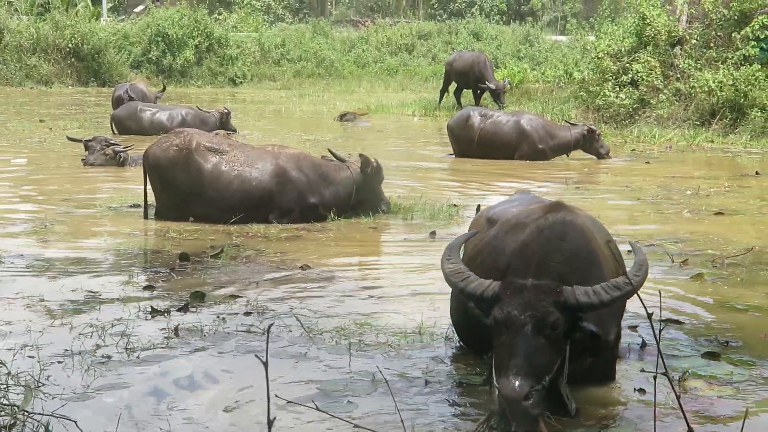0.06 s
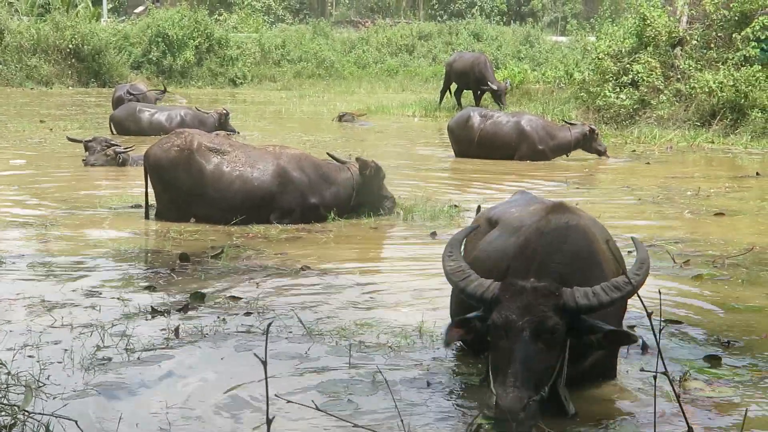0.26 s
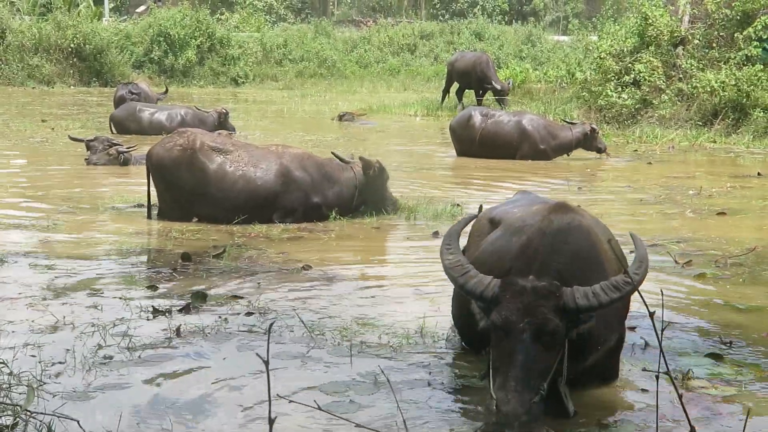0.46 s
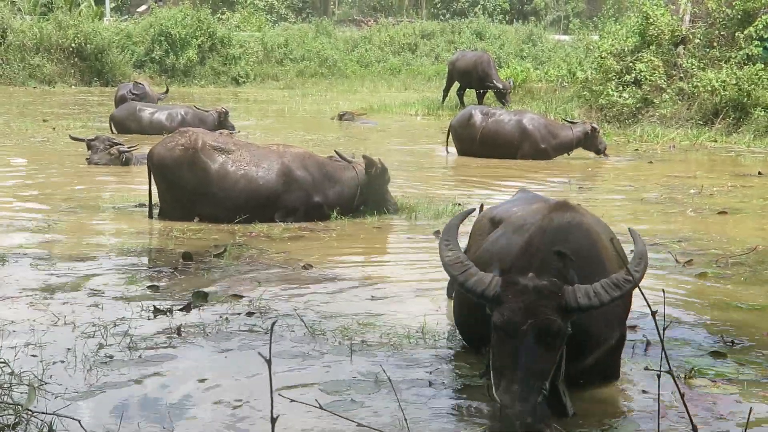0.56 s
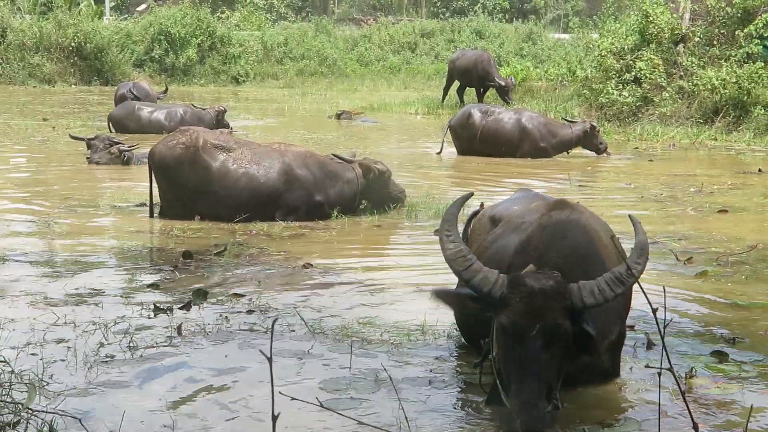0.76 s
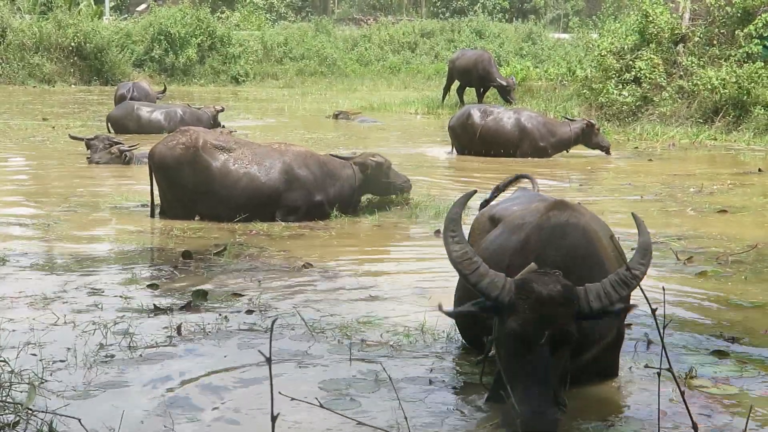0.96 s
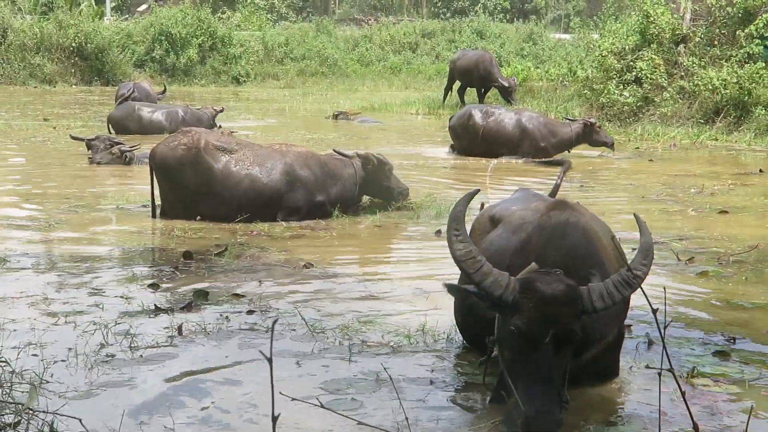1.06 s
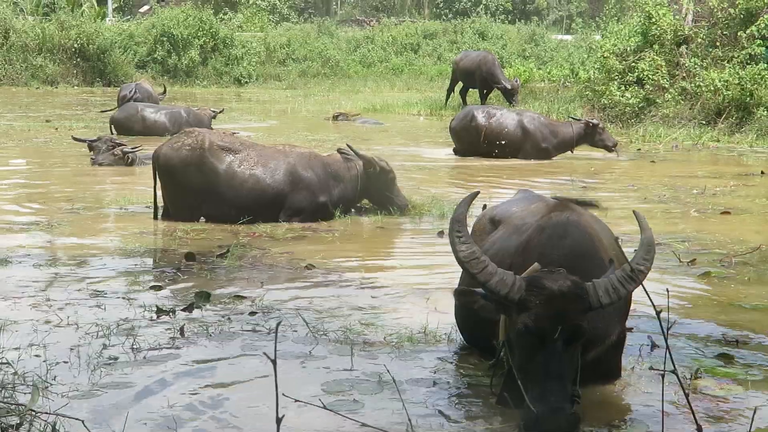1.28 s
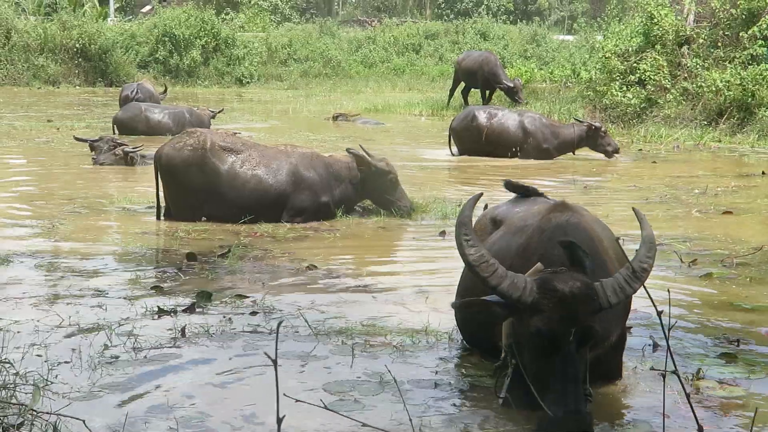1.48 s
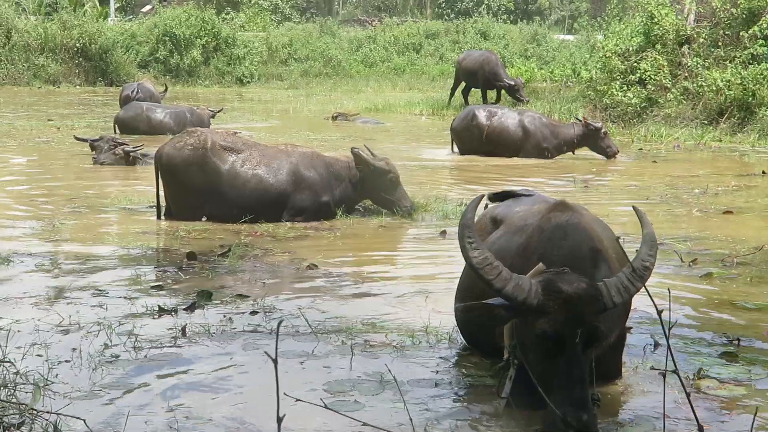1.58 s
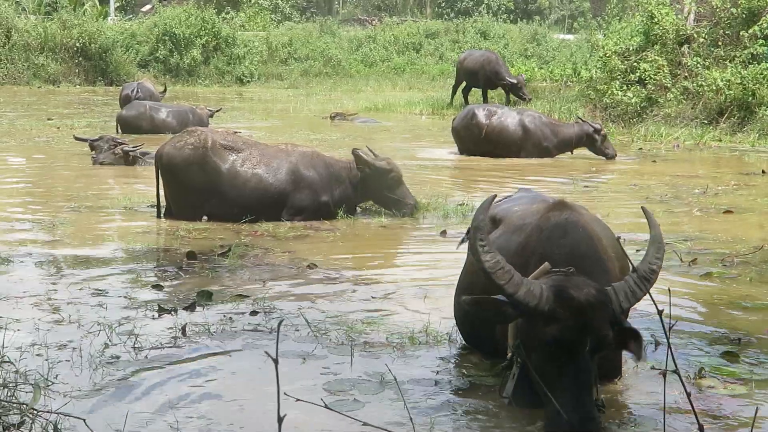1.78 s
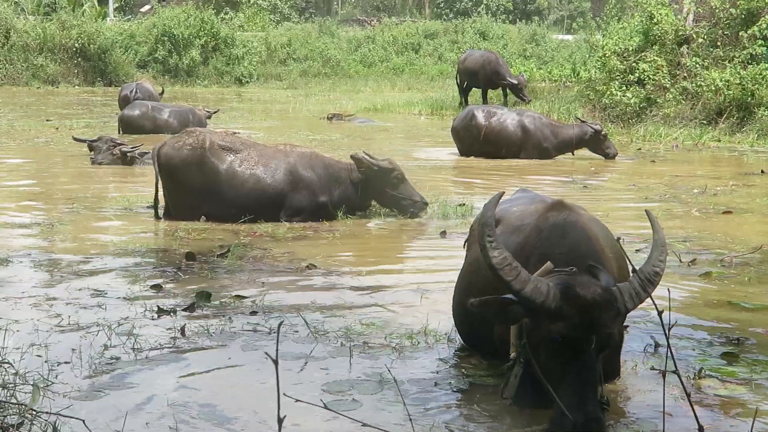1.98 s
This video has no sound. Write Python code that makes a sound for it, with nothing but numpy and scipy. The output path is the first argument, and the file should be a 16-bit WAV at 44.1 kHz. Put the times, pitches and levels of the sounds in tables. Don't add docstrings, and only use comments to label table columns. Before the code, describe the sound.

Water gurgles and fizzes softly around wading buffaloes over a low distant rumble that fades later. A thin high double squeak glides at 0.15-0.45 s; a small bell clinks at 0.4 s, then faintly near 0.9-1.0 s. Drops and splashes burst around 0.8 and 1.0 s. A sharp drop lands left at 1.44 s, a heavy bubbling plunge follows at 1.5 s, another splash at 1.72 s, then trickling bubbles.

```python
import sys
import numpy as np
from scipy import signal
from scipy.fft import rfft, irfft, next_fast_len
from scipy.io import wavfile
from scipy.ndimage import uniform_filter1d, map_coordinates

SR = 44100
rng = np.random.default_rng(int(sys.argv[2]) if len(sys.argv) > 2 else 0)


def elevation(decibels):
    levels = np.asarray(decibels, float)
    return 10 ** (levels / 20)


def persist_wave(psi):
    counts = np.round(np.clip(psi, -1, 1) * 32767).astype(np.int16)
    wavfile.write(sys.argv[1], SR, np.atleast_2d(counts).T)


N = 89478


def unit(x):
    return x / np.sqrt(np.mean(x ** 2) + 1e-20)


def along(points, hz):
    f, value = np.transpose(points)
    return np.interp(np.log(hz + 1), np.log(f + 1), value)


def curves(rows):
    s, *columns = np.transpose(rows)
    return [np.interp(np.arange(N) / SR, s, column) for column in columns]


def wobble(rate):
    knots = rng.standard_normal(int(N * rate / SR) + 4)
    return map_coordinates(knots, [np.arange(N) * rate / SR])


def filtered(x, response):
    m = next_fast_len(x.shape[-1] + 8192)
    spectrum = rfft(x, m) * response(np.fft.rfftfreq(m, 1 / SR))
    return irfft(spectrum, m)[..., :x.shape[-1]]


def rush(spectrum, patchy_db):
    z = signal.stft(rng.standard_normal((2, N)), nperseg=512)[2]
    patches = uniform_filter1d(rng.standard_normal(z.shape[1:]), 6, 0)
    patches = uniform_filter1d(patches, 8, 1)
    pair = signal.istft(z * elevation(patchy_db * unit(patches)), nperseg=512)[1][:, :N]
    return unit(filtered(pair, lambda hz: elevation(along(spectrum, hz))))


def rings(s, db, hz, rise, t60, attack, size):
    t = np.arange(size) / SR
    t60 = np.clip(t60, 2e-4, 9)[:, None]
    glide = 1 + rise[:, None] * np.minimum(t / t60, 1)
    tone = np.sin(2 * np.pi * hz[:, None] * t * glide)
    decay = elevation(db[:, None] - 60 * t / t60)
    wave = decay * (1 - np.exp(-t / attack)) * tone * (t < t[-1])
    at = np.round(s * SR).astype(int)[:, None] + np.arange(size)
    return np.bincount(at.ravel(), wave.ravel(), N + size + SR)[:N]


def grains(count, hz, octave_scatter, cycles, scatter_db):
    u, g = rng.random((count, 2)), rng.standard_normal(count)
    f = np.clip(hz * np.exp(octave_scatter * g), 300, 14000)
    db = -scatter_db * np.log(u[:, 1] + 0.048)
    return unit(rings(u[:, 0] * N / SR, db, f, 0.25 + 0 * f, cycles / f, attack=3e-4, size=1000))


def smeared(x):
    smear = rng.standard_normal(200) * np.exp(-np.arange(200) / 40)
    return np.array([x, np.convolve(x, smear / np.linalg.norm(smear))[:N]])


# t/s, level/dB
RUMBLE_SWELL = [(0, -32.5), (.4, -31.5), (.7, -35.5), (.95, -32), (1.4, -34.5), (1.55, -37.5),
                (2.03, -38.5)]
# f/Hz, level/dB
RUMBLE_COLOUR = [(15, -45), (30, -16), (42, -4.5), (92, 0.5), (134, 0), (152, -4.5), (182, -16.5),
                 (260, -45)]


def rumble():
    level_db, = curves(RUMBLE_SWELL)
    return elevation(level_db + 1.3 * wobble(14)) * rush(RUMBLE_COLOUR, patchy_db=.4)


# t/s, level/dB
WADING = [(0, -44), (.2, -43.5), (.45, -42), (.68, -42.5), (.9, -42), (1.2, -42), (1.4, -41.5),
          (1.6, -42.5), (1.8, -42), (2.03, -42)]
# f/Hz, level/dB
WATER_COLOUR = [(120, -37), (190, -1.5), (400, -3.5), (1500, -9.5), (6000, -18), (10000, -23), (14000, -28),
                (16200, -60)]


def water():
    level_db, = curves(WADING)
    gurgle = grains(count=260, hz=1006, octave_scatter=0.64, cycles=13.5, scatter_db=0.9)
    fizz = grains(count=500, hz=5500, octave_scatter=.5, cycles=6, scatter_db=2.5)
    bits = elevation(-12) * gurgle + elevation(-10.5) * fizz
    return elevation(level_db + 0.73 * wobble(12.63)) * (rush(WATER_COLOUR, patchy_db=1.22) + smeared(bits))


# t/s, f/Hz, level/dB
SQUEAK = [(.15, 9300, -72), (.19, 10300, -59), (.23, 10800, -60), (.27, 11000, -61.5), (.295, 10500, -61),
          (.33, 10700, -57), (.355, 10300, -60), (.41, 9900, -66), (.44, 9700, -78)]


def squeak():
    hz, db = curves(SQUEAK)
    t = np.arange(N) / SR
    on = (t > SQUEAK[0][0]) & (t < SQUEAK[-1][0])

    def tone(ratio):
        shaky_hz = ratio * hz * (1 + 0.004 * wobble(150))
        return elevation(1.8 * wobble(60.6)) * np.sin(2 * np.pi * np.cumsum(shaky_hz) / SR)

    return smeared(on * elevation(db + 2.0) * (tone(1) + elevation(-1.5) * tone(1.18)))


# t/s, peak level/dB, start f/Hz, pitch rise [share], life t60/s
BUBBLES = [(0.254, -37, 7000, .05, .02), (.26, -33.5, 577, 0.15, 0.056), (.507, -35, 1140, 0.12, .015),
           (.655, -40.5, 8800, .05, .03), (.73, -41, 940, .03, .06), (.732, -42, 1220, .03, .07),
           (.752, -41, 1220, .03, .09), (.754, -40, 980, .03, .06), (.765, -39.5, 897, .04, .1),
           (.79, -42, 1250, .03, 0.088), (.8, -37, 990, .04, .06), (.817, -31, 1940, .04, .025),
           (.82, -37, 1480, .04, .03), (.822, -35, 956, .05, .05), (.825, -40, 3040, 0.023, 0.055),
           (.575, -40, 1090, .02, .05), (1.0617, -29, 1213, 0.041, 0.029),
           (1.093, -35.5, 1230, 0.083, 0.037), (1.3, -34, 1165, 0.054, 0.048),
           (1.415, -33.5, 1430, .1, 0.033), (1.483, -28, 276, .2, 0.056), (1.484, -21, 500, .15, 0.057),
           (1.4917, -19.5, 544, .05, .035), (1.491, -21.5, 2150, 0.26, 0.028),
           (1.493, -20, 1204, 0.15, 0.027), (1.5075, -11.5, 900, 0.1, 0.021),
           (1.5107, -13.5, 1220, 0.09, 0.023), (1.509, -27, 3050, .03, .025), (1.718, -29, 260, .1, .06),
           (1.728, -31, 380, .1, .04), (1.645, -37, 1990, 0.031, 0.031), (1.755, -37, 955.3, 0.088, 0.058),
           (1.81, -39.5, 1133, .05, 0.046), (1.81, -41.5, 362, 0.046, 0.12), (1.855, -37, 910, -.1, .03),
           (1.727, -32, 1005, 0.08, 0.034), (1.897, -37, 710, 0.08, 0.026), (1.897, -33, 1430, .05, 0.029)]


def bubbles():
    return smeared(elevation(3.5) * rings(*np.transpose(BUBBLES), attack=0.0024, size=4000))


# t/s, peak level/dB, f/Hz
DROPS = [(0.395, -29, 3500), (.467, -26, 8900), (.472, -41, 2500), (0.508, -31.5, 2000), (0.773, -27, 8000),
         (0.824, -27, 7450), (.826, -23, 8500), (0.8296, -17.5, 6200), (.788, -31, 6000), (.804, -26, 8500),
         (.855, -30, 8000), (0.866, -29, 9000), (1.008, -28.5, 5000), (1.004, -27, 12000),
         (.773, -30, 13500), (1.0, -23, 8000), (1.02, -25.5, 6500), (1.025, -32, 1540), (1.063, -24, 6500),
         (1.063, -27, 3000), (1.167, -26.5, 4700), (1.167, -26.5, 2250), (1.229, -29, 8000),
         (1.4403, -22, 7500), (1.4402, -27.5, 2230), (1.4403, -25, 14000), (1.443, -27, 7000),
         (1.446, -29, 8500), (1.696, -28, 1300), (1.696, -28, 750), (1.7136, -21, 3000),
         (1.7135, -26, 1700), (1.726, -24, 2500), (1.485, -27, 3300), (1.7156, -21, 5500),
         (1.714, -17, 10100), (1.726, -16.5, 4030), (1.935, -29, 8000), (2.012, -31, 7000)]


def drops():
    s, db, hz = np.transpose(DROPS)
    return smeared(rings(s, db + 5, hz, 0 * s, 9 / hz, attack=4e-5, size=600))


# f/Hz, level/dB, t60/s
BELL_MODES = [(1104, -10, .45), (1513, -13, .8), (2616, -13, .5), (2832, -1, .11), (6030, -15, .1),
              (6745, -5, .15), (7628, -9, .15), (10300, -13, .06)]
# t/s, peak level/dB, brightness [dB per octave]
CLINKS = [
    (.4105, -33, -.6),
    (.466, -48, 3),
    (.5, -49, 3),
    (.873, -41, 9),
    (.958, -41, 9),
    (.999, -42, 9),
]


def bell():
    hz, level_db, t60 = np.transpose(BELL_MODES)
    ring = np.zeros(N)
    for s, db, tilt in CLINKS:
        mode_db = db + level_db + tilt * np.log2(hz / 7000) + rng.normal(0, 1.5, len(hz))
        ring += rings(s + 0 * hz, mode_db, hz, 0 * hz, t60, attack=4e-4, size=14000)
    ring *= elevation(1.6 * wobble(40.3))
    quarter_turn = filtered(ring, lambda f: 1j + 0 * f)
    return np.array([ring, quarter_turn])


# t/s, peak level/dB, f/Hz
ASIDE = [
    (.508, -26, 1500),
    (.508, -28, 3500),
    (1.228, -31, 8000),
    (1.4403, -14, 7500),
    (1.4403, -19, 13000),
]


def drops_aside():
    s, db, hz = np.transpose(ASIDE)
    return np.outer([.4, 1], rings(s, db + 5.5, hz, 0 * s, 4 / hz, attack=4e-5, size=600))


# t/s of the peak, level/dB, centre f/Hz, rise/s, fall t60/s
SPLASHES = [(.775, -43, 1000, .03, .5), (0.774, -44, 7200, 0.002, 0.3), (.805, -41, 7600, 0.011, .4),
            (.828, -31, 7000, 0.005, 0.05), (.82, -43, 2500, 0.024, 0.23),
            (.828, -41.5, 14000, 0.0083, .15), (.855, -45.5, 7500, 0.014, 0.23),
            (.953, -40.5, 9500, 0.008, 0.27), (1.0, -39, 7500, 0.0022, 0.15),
            (1.003, -41.5, 4100, 0.0034, .15), (.98, -43.5, 9500, .012, .2), (1.17, -44.5, 3900, .015, .2),
            (1.46, -42, 1700, 0.022, 0.33), (1.06, -46, 3100, 0.015, 0.23),
            (1.441, -38.5, 9600, .0006, 0.33), (1.492, -31.5, 2100, 0.0058, .2),
            (1.515, -33.5, 1500, .01, 0.35), (1.55, -34, 3130, 0.018, 0.12),
            (1.685, -39, 2200, 0.0088, 0.21), (1.716, -31.5, 4300, 0.0066, 0.18),
            (1.722, -37.5, 1500, .012, .12), (1.725, -36, 230, .015, 0.083),
            (1.718, -37.5, 11400, 0.0066, 0.18), (1.5, -38, 380, 0.017, 0.27)]


def splashes():
    size, lead = 12000, 4000
    out = np.zeros((2, N + SR))
    t = (np.arange(size) - lead) / SR
    spikes = elevation(2.5 * wobble(600))
    for s, db, centre, rise, t60 in SPLASHES:
        octaves = 0.42 if centre > 6000 else 0.89
        noise = filtered(rng.standard_normal((2, size)),
                         lambda f: np.exp(-.5 * (np.log2((f + 1) / centre) / octaves) ** 2))
        swell = np.exp(-.5 * (t / rise) ** 2)
        shape = np.where(t < 0, swell, elevation(-60 * np.abs(t) / t60))
        start = round(s * SR) - lead
        out[:, start:start + size] += elevation(db) * shape * unit(noise)
    return out[:, :N] * unit(spikes)


# f/Hz, share
PORT_SHARE = [(1500, .05), (7000, .15), (13000, .5)]


def widened(mid, other, side_db, width):
    def response(hz):
        share = np.clip(along(PORT_SHARE, hz), 0, 1)
        return elevation(side_db + along(width, hz)) * np.array([1j * np.sqrt(share), np.sqrt(1 - share)])

    return np.array([mid, filtered(np.array([mid, other]), response).sum(0)])


# f/Hz, side minus mid/dB
WIDTH = [(30, -19), (130, -9), (290, 1), (640, -5), (1400, -8), (3000, -7), (6000, -.6), (15000, 1.5)]
# f/Hz, side minus mid/dB
NEAR_WIDTH = [(200, -6), (640, -9), (1400, -16), (3500, -15), (6000, -2.5), (15000, -0.5)]
# f/Hz, left minus right/dB
BALANCE = [(100, 1.5), (500, -.6), (2000, 0), (8000, 3.2), (14000, 2)]


def scene():
    far = rumble() + water()
    near = squeak() + bubbles() + drops() + splashes()
    mid_side = widened(*far, side_db=1.0, width=WIDTH)
    mid_side = mid_side + widened(*near, side_db=-0.5, width=NEAR_WIDTH)
    mid_side = mid_side + widened(*bell(), side_db=0, width=WIDTH)
    mid, side = mid_side + drops_aside()
    return filtered(np.array([mid + side, mid - side]),
                    lambda hz: elevation(np.outer([.5, -.5], along(BALANCE, hz))))


# f/Hz, level/dB
TREBLE_END = [(9500, 0), (12000, -2), (14000, -3), (15300, -4.5), (15800, -7), (16300, -30), (16700, -80)]


def treble_end(x):
    return filtered(x, lambda hz: elevation(along(TREBLE_END, hz)))


def low_pass(x):
    return signal.sosfilt(signal.butter(12, 15750, fs=SR, output="sos"), x)


def record(dry):
    mix = treble_end(dry)
    return low_pass(mix)


dry = scene()
out = record(dry)
persist_wave(out)
```